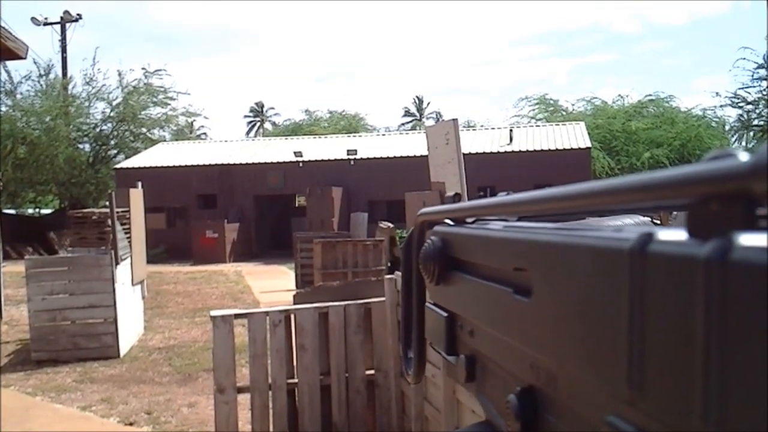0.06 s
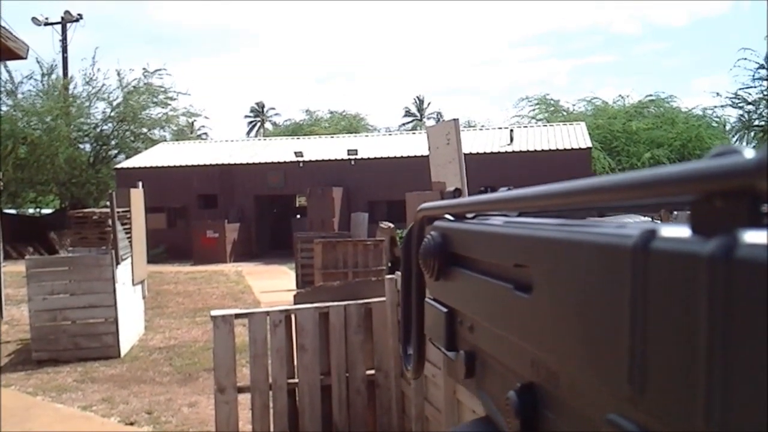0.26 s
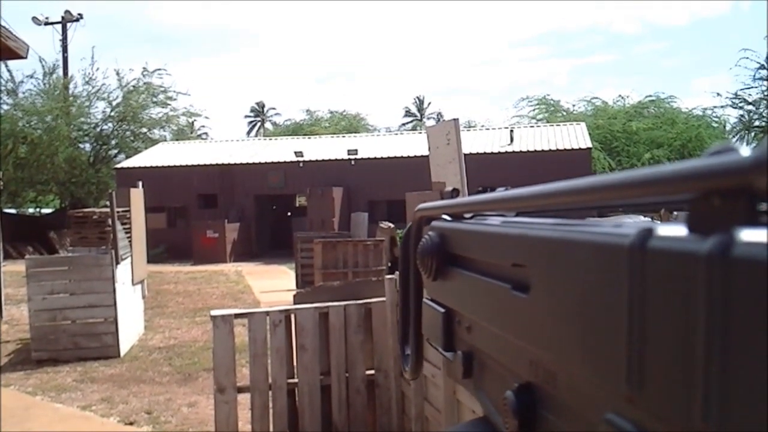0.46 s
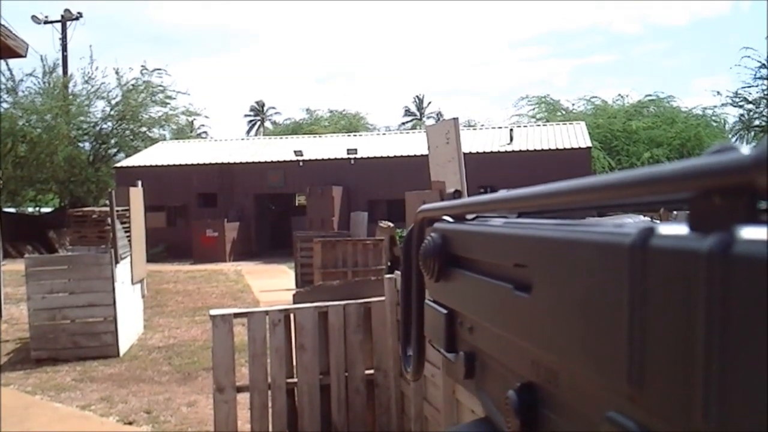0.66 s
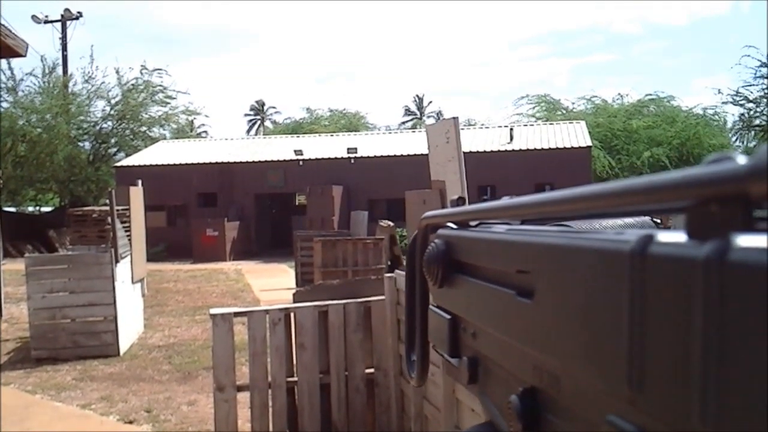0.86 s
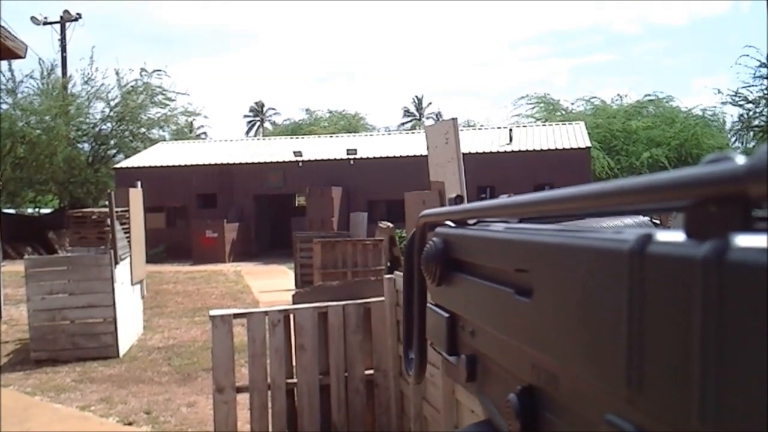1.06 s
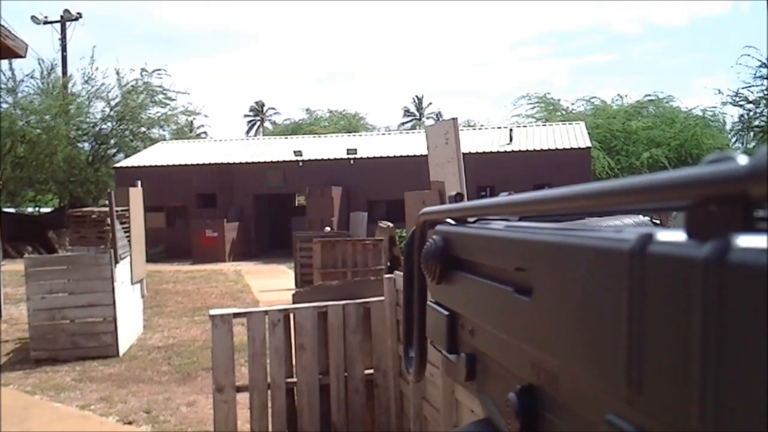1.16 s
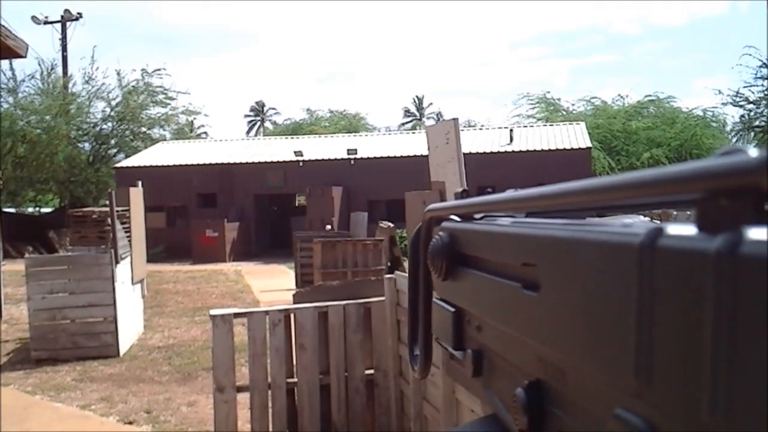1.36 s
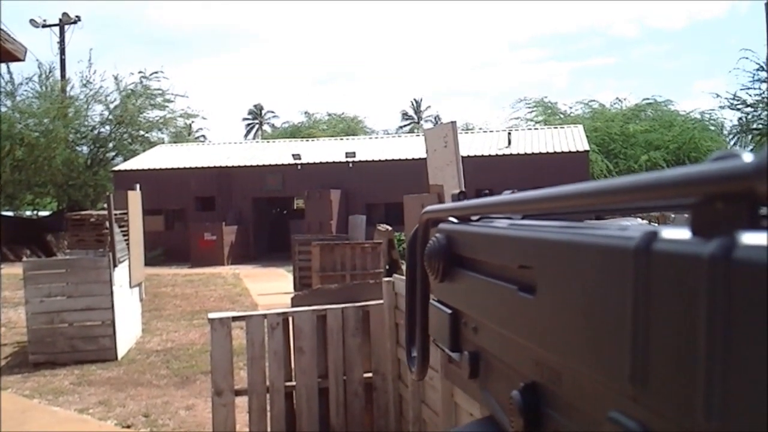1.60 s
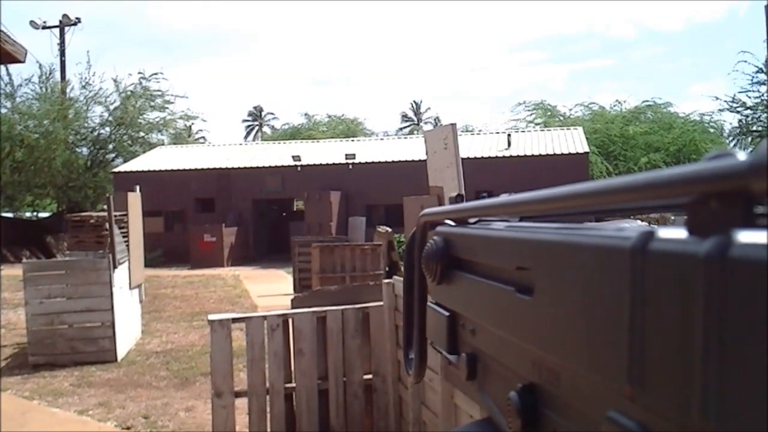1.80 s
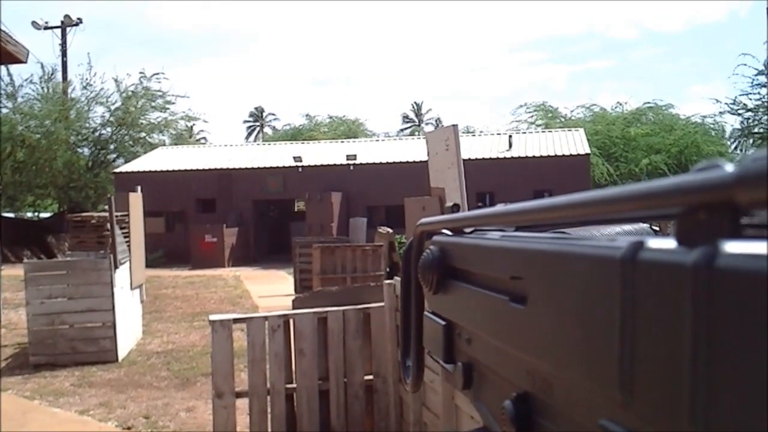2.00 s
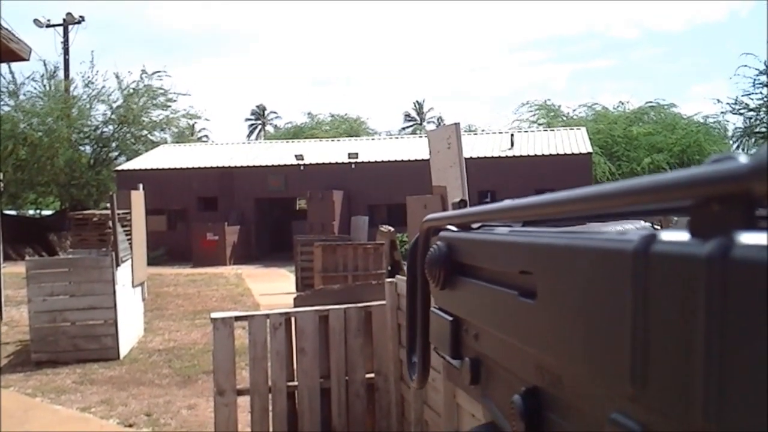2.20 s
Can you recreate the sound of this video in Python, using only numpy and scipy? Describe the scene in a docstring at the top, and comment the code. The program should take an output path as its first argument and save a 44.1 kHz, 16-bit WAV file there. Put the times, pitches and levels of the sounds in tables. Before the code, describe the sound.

Close, bright and thin in the bass: a motor zips up, a piston clatters about sixteen times a second, then winds down; after a near-quiet gap with small ticks it repeats, slightly longer, in open air.

```python
"""Outdoors, an electric airsoft gun fires two full-auto bursts right beside the microphones.
The motor spins up as gliding tones over rattle; gears whine with rising load as they pull the piston back.
The piston slams about 16 times a second, as swelling modes and air noise; then the motor runs down.
Short ticks, among them a gear pick-up after the last slam, are noise bursts; filtered-noise hiss lies below,
with two faint sine hoots. The recorder's gain control ducks all of it."""
import sys
import numpy as np
from scipy import signal
from scipy.fft import rfft, irfft
from scipy.io import wavfile
from scipy.ndimage import uniform_filter1d

SR = 44100
rng = np.random.default_rng(int(sys.argv[2]) if len(sys.argv) > 2 else 0)


def transcribe(u):
    """Save the signal u as a 16-bit wav file named by the first command-line argument.

    u: samples, shape (n,) or (channels, n), limited to [-1, 1]; the rate is SR.
    q: integer samples, one column per channel.
    """
    v = np.clip(np.atleast_2d(u).T, -1, 1)
    q = np.round(v * 32767).astype(np.int16)
    wavfile.write(sys.argv[1], SR, q)


def gain_from_decibels(decibels):
    """Convert decibel values to linear amplitude factors."""
    exponent = np.asarray(decibels, float) / 20
    return 10 ** exponent


N = 99225
T = np.arange(N) / SR
HZ = np.maximum(np.arange(N // 2 + 1) * SR / N, 10)

# piston slams: [t/s at which the piston stops, relative level/dB]
SLAM_TIMES = [(0.2981, -6), (0.3677, -8), (0.432, -10.5), (0.496, -10.5), (0.558, -10.5), (0.6201, -10),
              (0.6823, -10.5), (0.7432, -8.5), (0.8314, -9.5), (1.2809, -4.5), (1.3513, -8.5),
              (1.415, -8.5), (1.4806, -10), (1.5444, -9.5), (1.6083, -9.5), (1.6716, -8.5), (1.7354, -9.5),
              (1.7976, -7.5), (1.8621, -11), (1.9279, -9.5)]
HOUSING_HZ = 4800   # resonance of the shell
PICKUP_S = .011   # from a slam until the gear picks the piston up again


def rms_one(x):
    """Normalization: scale to unit root-mean-square."""
    return x / np.sqrt(np.mean(x ** 2) + 1e-20)


def at_hz(points):
    """Logarithmic frequency axis: interpolate a (f/Hz, value) table at every spectral bin."""
    hz, value = np.transpose(points)
    return np.interp(np.log(HZ), np.log(np.maximum(hz, 10)), value)   # the axis starts at 10 Hz


def drift(rate):
    """Random modulation: noise through a double-pole low-pass at rate Hz, rms 1."""
    pole = np.exp(-2 * np.pi * rate / SR)
    noise = rng.standard_normal(N + SR)
    return rms_one(signal.lfilter([1], [1, -2 * pole, pole * pole], noise)[SR:])   # drop the settling second


def coloured(spectrum, white):
    """Spectral shaping: weight white noise by a (f/Hz, level/dB) table, rms 1."""
    return rms_one(irfft(rfft(white) * gain_from_decibels(at_hz(spectrum)), N))


def ports(shared, unshared, likeness):
    """Interchannel coherence: two ports hear a shared part alike and an unshared part in opposite sign."""
    # level difference of the ports: [f/Hz, left over right/dB]
    tilt = [(60, -6), (380, 0.5), (2380, 0), (15000, 4)]
    # phase difference of the ports: [f/Hz, lead of the left/rad]
    lead = [(0, 6.5), (1980, -1.76), (5860, 1.04), (9130, -2.5), (13800, -5.5), (16400, 16)]
    alike = np.clip(likeness, 0, 1)
    half = gain_from_decibels(at_hz(tilt) / 2) * np.exp(.5j * at_hz(lead))
    mid = np.sqrt((1 + alike) / 2) * rfft(shared)
    side = np.sqrt((1 - alike) / 2) * rfft(unshared)
    return np.array([irfft((mid + side) * half, N), irfft((mid - side) / half, N)])


def hiss():
    """Broadband noise: shared and unshared shaped noise whose levels waver independently."""
    # hiss spectrum: [f/Hz, relative level per Hz/dB]
    spectrum = [(60, -62), (230, -19.5), (417, -14.5), (822, -9.5), (1010, -12), (1340, 1), (2000, -6),
                (2840, -1), (6740, -7), (9570, -17.5), (16000, -57)]
    return [gain_from_decibels(-40 + drift(21)) * coloured(spectrum, rng.standard_normal(N)) for _ in range(2)]


def hoots():
    """Frequency modulation: faint far sines of wavering pitch under half-sine envelopes."""
    # hoots: [t/s, length/s, f/Hz, relative level/dB]
    table = [(0.034, 0.072, 704, -43), (0.89, 0.29, 443, -52.5)]
    out = np.zeros(N)
    for s, length, hz, db in table:
        envelope = np.sin(np.pi * np.clip((T - s) / length, 0, 1))
        phase = 2 * np.pi * np.cumsum(hz + 18 * drift(43)) / SR
        out += gain_from_decibels(db + 2 * drift(30)) * envelope * np.sin(phase)
    return out


def background():
    """Diffuse and coherent sound: hiss whose port likeness varies with frequency, and hoots in its shared part."""
    # likeness of the hiss at the two ports: [f/Hz, likeness 0-1]
    likeness = [(60, 0), (380, 0.71), (2380, 1), (15000, 0)]
    shared, unshared = hiss()
    return ports(shared + hoots(), unshared, at_hz(likeness))


def ticks():
    """Damped impacts: short ticks, among them a gear pick-up after the last slam, as dying band noise."""
    # ticks: [t/s, relative level/dB, centre f/Hz, t60/s]
    table = [(0.0647, -31.5, 4150, 0.11), (0.081, -34.5, 3900, 0.072), (0.8795, -18.5, 6000, 0.015),
             (0.9567, -18.5, 4900, 0.029), (1.1067, -32, 2870, 0.024), (1.9435, -24, 5500, 0.012),
             (2.0388, -27, 3940, 0.052), (2.1053, -30.5, 3580, 0.018), (2.2404, -34, 3880, 0.032)]
    attack_s = 0.00096
    out = np.zeros((2, N))
    for s, db, hz, t60 in table:
        band = signal.butter(3, [hz / 1.8, hz * 1.35], "band", fs=SR, output="sos")
        a, b = rng.standard_normal((2, N))
        noise = rms_one(signal.sosfilt(band, [a + .4 * b, a - .4 * b]))   # partly alike in both channels
        decay = gain_from_decibels(db + 1.5 - 60 * np.maximum(T - s, 0) / t60)
        out += noise * (T >= s) * decay * np.clip((T - s) / attack_s, 0, 1)
    return out


def whine(hz, level_db, orders, best_hz=HOUSING_HZ, octaves=.36, wobble_db=3):
    """Gear-mesh tones: wobbling sines on multiples of a pitch, favoured near the shell resonance."""
    away_db = -20   # level far from the resonance
    out, hz = 0, hz + 18 * drift(235)
    for k, db in orders:
        distance = np.log2(np.maximum(k * hz, 50) / best_hz) / octaves
        shell = away_db * (1 - np.exp(-distance ** 2))
        out = out + gain_from_decibels(db + shell + wobble_db * drift(118)) * np.sin(2 * np.pi * np.cumsum(k * hz) / SR)
    return np.sqrt(2) * gain_from_decibels(level_db) * out


def glide(rows, orders, **shell):
    """Changing rotation speed: interpolated whine pitch and levels; gives the span, rattle envelope and tones."""
    s, hz, tone_db, rattle_db = np.transpose(rows)
    on = (T >= s[0]) & (T < s[-1])
    tones = on * whine(np.interp(T, s, hz), np.interp(T, s, tone_db), orders, **shell)
    return on, on * gain_from_decibels(np.interp(T, s, rattle_db)), tones


def spin_ups():
    """Rotational acceleration: the pinion, which radiates over a wider range, whines upward."""
    # spin-up of each burst: [t/s, pinion whine f/Hz, relative whine level/dB, relative rattle level/dB]
    bursts = [
        [(.222, 1514, -69, -53), (.234, 2127, -35, -33.5), (.245, 3336, -23.5, -36.5), (.258, 4746, -29, -24.5),
         (.27, 5700, -37, -28), (.295, 6940, -19, -24)],
        [(1.19, 1299, -55, -45), (1.206, 3013, -27.5, -41.5), (1.216, 3900, -28, -29),
         (1.226, 4930, -27, -34.5), (1.237, 5675, -45, -24), (1.253, 6400, -22.5, -27),
         (1.279, 6900, -21, -23.5)],
    ]
    # tones of the pinion: [multiple of its whine pitch, relative level/dB]
    orders = [(1, 2.5), (.5, 0), (1.5, -2)]
    return [glide(rows, orders, best_hz=4850, octaves=.45) for rows in bursts]


def run_downs():
    """Rotational deceleration: the unloaded gears whine downward while their rattle fades."""
    # run-down of each burst: [t/s, gear mesh f/Hz, relative whine level/dB, relative rattle level/dB]
    bursts = [
        [(.745, 4730, -67, -33), (.756, 4550, -40, -41), (.78, 3700, -40, -36), (.797, 3290, -52, -36),
         (.812, 2330, -39.5, -43), (.828, 1800, -39, -38), (.84, 1480, -74, -46.5), (.899, 805, -81, -44),
         (.915, 700, -74, -56)],
        [(1.865, 4600, -55, -39), (1.875, 4550, -40, -37), (1.898, 4355, -38, -35.5), (1.92, 3548, -36.5, -38),
         (1.957, 3386, -43, -41), (1.975, 2470, -43, -35.5), (2.0, 1915, -45, -45), (2.012, 1610, -70, -43.5)],
    ]
    # tones of the gears: [multiple of the mesh pitch, relative level/dB]
    orders = [(1, 4), (1.62, 4), (2.15, 3)]
    return [glide(rows, orders) for rows in bursts]


def powered_strokes():
    """Speed under load: a free run, a pick-up, then rising load and sagging pitch until the piston is let go."""
    # powered strokes of each burst: [index of first slam, number of strokes that follow]
    bursts = [(0, 7), (9, 9)]
    # steady gear mesh pitch of each burst: [f/Hz]
    mesh = [4570, 4500]
    let_go_s = .005   # the whine stops as the gear lets the piston go
    hz, rattle, tone = np.full(N, float(HOUSING_HZ)), np.zeros(N), np.zeros(N)
    for (first, strokes), mesh_hz in zip(bursts, mesh):
        for k in range(strokes):
            s, end = SLAM_TIMES[first + k][0], SLAM_TIMES[first + k + 1][0]
            early = .38 ** k   # early strokes are slower, louder and sag less
            on = (T >= s) & (T < end)
            loaded = T >= s + PICKUP_S + .003 * early
            t = T - (s + PICKUP_S + end) / 2   # from mid-pull
            pull_db = 26 * t * (1 + 2 * early)
            stroke_db = np.where(loaded & (T < end - let_go_s / 2), pull_db, -5)   # free run at -5
            level = on * gain_from_decibels(-35 + 5 * early + stroke_db)
            rattle += level
            tone += level * loaded * (T < end - let_go_s)
            sag = 11000 * (1 - .45 * early) * t   # Hz
            hz[on] = (mesh_hz - 420 * early - sag)[on]
    tone = uniform_filter1d(tone, size=90)
    return rattle, tone * whine(hz, 0, [(1, 0)], octaves=np.inf, wobble_db=1.8)   # no shell weighting


def rattle_noise():
    """Random impacts: sparse grains of random strength and sign mixed with steady noise, two parts."""
    struck = rng.random((2, N)) < 4000 / SR   # 4000 grains per second
    strength = gain_from_decibels(2.5 * np.minimum(rng.exponential(1, (2, N)), 4))
    grains = struck * strength * rng.choice([-1, 1], (2, N))
    return rms_one(grains) + rng.standard_normal((2, N))


def motor():
    """Excitation and resonance: rattle drives a narrow shell ring, stronger in spin-up, beside the gear tones."""
    # rattle spectrum: [f/Hz, relative level per Hz/dB]
    spectrum = [(150, -75), (1290, -19.5), (4080, -9.5), (4490, -5.5), (7320, -12), (9080, -17.5),
                (12700, -23), (16000, -77)]
    rattle, tones = powered_strokes()
    ring = np.full(N, gain_from_decibels(-20))
    starts = spin_ups()
    for on, _, _ in starts:
        ring[on] = gain_from_decibels(-8)
    for _, envelope, whines in starts + run_downs():
        rattle += envelope
        tones += whines
    noise = rattle_noise()
    peak = signal.iirpeak(HOUSING_HZ, HOUSING_HZ / 110, SR)   # 110 Hz wide
    shell = rms_one(signal.lfilter(*peak, noise[0]))
    shared, unshared = (coloured(spectrum, part) * rattle for part in noise)
    return shared + shell * ring * rattle + tones, unshared


def slams():
    """Impact excitation: modes and air swell until the piston stops, rebounds and rings; thud and pick-up follow."""
    # body and air modes: [f/Hz, swell before the stop/s, relative level/dB]
    mode_table = [(2565, 0.0035, -8.5), (3335, 0.0045, -13), (3900, 0.0018, -3), (4880, .0016, -4.5),
                  (5335, 0.0014, 1.5), (6690, 0.0024, -7), (7180, 0.0017, -8)]
    # rushing air spectrum: [f/Hz, relative level per Hz/dB]
    air_spectrum = [(300, -50), (1510, -5.5), (2480, 1), (3030, -0.5), (5160, -20), (6000, -11.5),
                    (6960, -4), (9240, -4), (16000, -26)]
    # thud modes: [f/Hz, relative level/dB, t60/s]
    thuds = [(1216, -23, 0.018), (682, -29, 0.018)]
    t = np.arange(-SR // 200, SR // 20) / SR   # the piston stops at 0
    tail = (t >= 0) * gain_from_decibels(-10 - 60 * t / .016) * np.clip(t / .001, .3, 1)   # rebound and ring

    def swell(rise_s):
        """Energy build-up: power rises linearly until the stop, then the tail follows."""
        rise = (t < 0) * np.sqrt(np.clip(1 + t / rise_s, 0, 1))
        return uniform_filter1d(rise + tail, size=10)

    pickup = (t > PICKUP_S) * gain_from_decibels(-20 - 60 * (t - PICKUP_S) / 0.0042)
    rush = gain_from_decibels(-11) * swell(.003) ** 2
    after = np.maximum(t - 0.00136, 0)   # the thud comes a little late
    thud = sum(gain_from_decibels(db - 60 * after / t60) * np.sin(2 * np.pi * hz * after) for hz, db, t60 in thuds)
    out = np.zeros((2, N))
    for part in out:   # shared, then unshared
        air = coloured(air_spectrum, rng.standard_normal(N))
        for s, db in SLAM_TIMES:
            i = int((s + t[0]) * SR)
            span = slice(i, i + len(t))
            modes = 0
            for hz, rise_s, mode_db in mode_table:
                phase, off = rng.random(2)
                mode_hz = hz * (1 + .04 * (off - .5))   # scattered within 2 % either way
                modes = modes + gain_from_decibels(mode_db) * swell(rise_s) * np.sin(2 * np.pi * (mode_hz * t + phase))
            puff = (rush + pickup) * air[span]
            uneven = 2 * rng.random()
            part[span] += gain_from_decibels(db) * (gain_from_decibels(-6.5) * modes + puff + uneven * thud)
    return out


def scene():
    """Superposition: the gun close by, thin in the bass, with ticks and background."""
    low_cut = signal.butter(4, 670, "high", fs=SR, output="sos")
    shared, unshared = signal.sosfilt(low_cut, np.array(motor()) + slams())
    gun = gain_from_decibels(14) * ports(shared, unshared, 0.84)
    return gun + ticks() + background()


def roll_off(x):
    """The treble ends steeply here."""
    return signal.sosfilt(signal.butter(12, 16820, fs=SR, output="sos"), x)


def record(dry):
    """Dynamic compression: gain ducks on loud sound and creeps back; peaks are rounded, rumble and top cut."""
    threshold_db, share = -28.5, 0.48   # share of the excess level that is taken off
    fall = 70 * T   # the held level falls 70 dB per second
    lag_s, top = 0.0081, .5   # time constant of the gain; ceiling of the rounded peaks
    level = 10 * np.log10(uniform_filter1d(np.mean(dry ** 2, axis=0), size=88) + 1e-12)
    held = np.maximum.accumulate(level + fall) - fall
    pole = np.exp(-1 / (lag_s * SR))
    cut_db = signal.lfilter([1 - pole], [1, -pole], share * np.maximum(held - threshold_db, 0))
    rounded = top * np.tanh(dry * gain_from_decibels(-cut_db) / top)
    band = signal.butter(1, [300, 13000], "band", fs=SR)
    return roll_off(signal.lfilter(*band, rounded))


dry = scene()
out = record(dry)
transcribe(out)
```